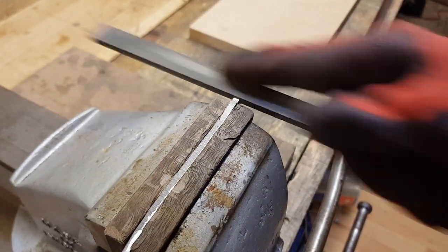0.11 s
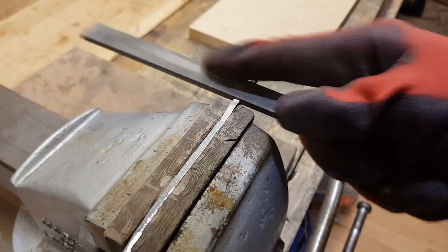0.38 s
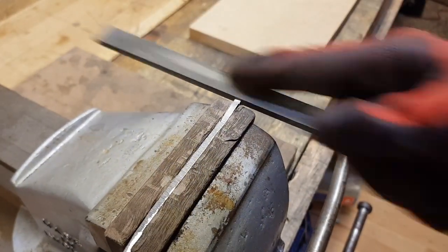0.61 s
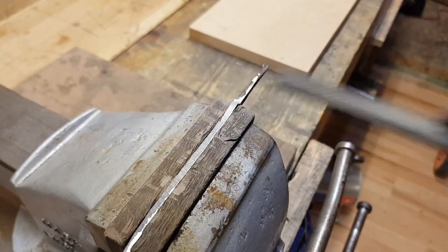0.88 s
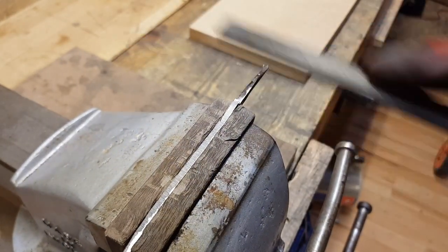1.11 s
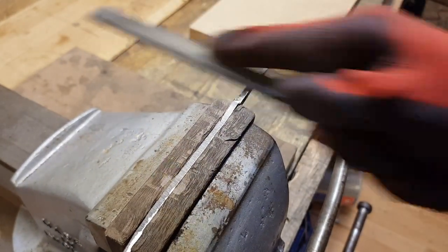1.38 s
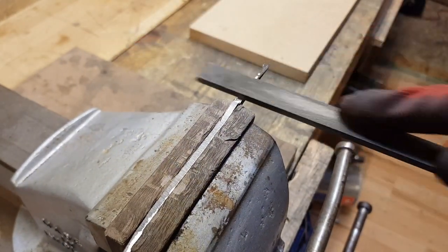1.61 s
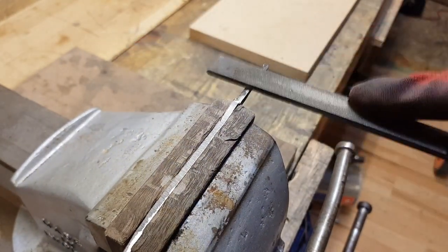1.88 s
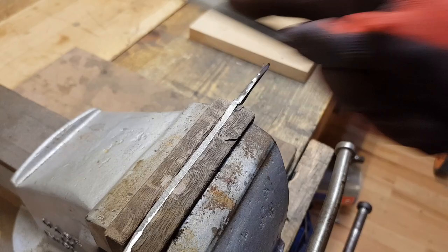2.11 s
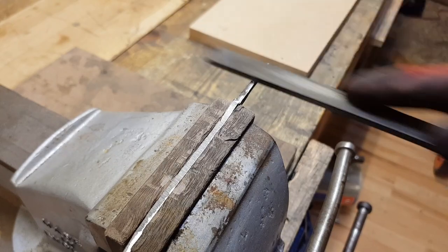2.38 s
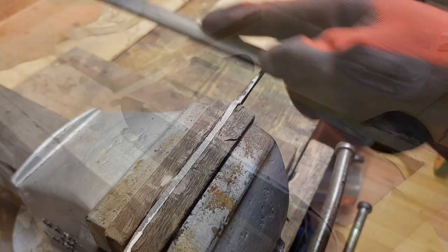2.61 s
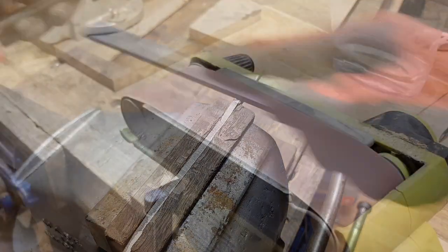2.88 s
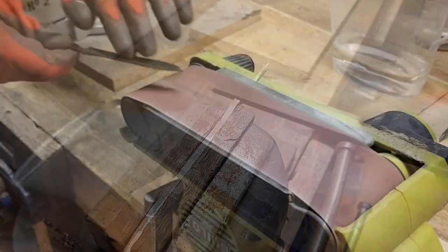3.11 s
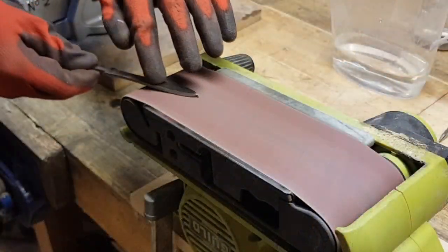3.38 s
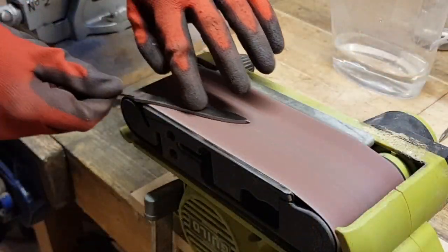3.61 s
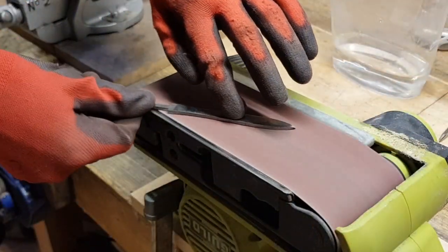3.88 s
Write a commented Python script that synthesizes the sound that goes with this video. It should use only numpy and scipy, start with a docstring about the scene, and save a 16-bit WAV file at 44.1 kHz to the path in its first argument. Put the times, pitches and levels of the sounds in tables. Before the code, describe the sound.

Metal filing in quick squeaky strokes, then slower pushes, before a belt sander runs up and whines

```python
"""A steel file works a thin blade clamped in a vice: quick back-and-forth strokes, then slower single pushes.
The rasp is made of dense uneven clicks that ring the steel; the blade chatters, squeaks and whistles in
short rough squeals, the file knocks the vice jaws, and filtered noise rumbles through the bench.
Then a belt sander fades in as it runs up to speed: tones tied to one speed whine over noise for air and grit.
Soft room tone lies beneath."""
import sys
import numpy as np
from scipy import signal
from scipy.fft import rfft, irfft
from scipy.io import wavfile
from scipy.ndimage import uniform_filter1d

SR = 44100
rng = np.random.default_rng(int(sys.argv[2]) if len(sys.argv) > 2 else 0)


def volts(x):
    """Linear amplitude factor 10**(x/20) for a level x in dB, scalar or array-like."""
    e = np.asarray(x, float) / 20
    return 10 ** e


def store_wav(level_fs):
    """Save 16-bit WAV to argv[1]."""
    pcm = np.round(np.clip(np.atleast_2d(level_fs), -1, 1) * 32767)
    wavfile.write(sys.argv[1], SR, pcm.T.astype(np.int16))


N = 176400
T = np.arange(N) / SR  # time in seconds
HZ = np.fft.rfftfreq(N, 1 / SR)  # frequency axis

# quick strokes that never leave the blade: (fastest moment t/s, rasp level/dB)
QUICK_STROKES = [(.022, -48), (0.06, -53.5), (0.097, -57), (0.134, -54), (0.167, -48), (0.199, -55),
                 (0.234, -52), (0.269, -55.5), (0.307, -50.5), (0.345, -55), (0.376, -51), (0.41, -50.5),
                 (0.447, -50), (0.513, -51.5), (0.549, -52), (.593, -51.5), (0.63, -53), (0.665, -52),
                 (.733, -45), (0.771, -52), (0.808, -51), (0.844, -53), (.892, -53.5), (0.927, -55.5)]
# single pushes: (touch t/s, hardest t/s, rasp level/dB, bench rumble level/dB)
SINGLE_PUSHES = [(1.022, 1.12, -58.5, -66.5), (1.214, 1.273, -61.5, -62.5), (1.339, 1.428, -58.5, -64.5),
                 (1.494, 1.578, -56, -62), (1.661, 1.745, -53.5, -59.5), (1.813, 1.884, -53.5, -58),
                 (1.956, 2.029, -52, -58), (2.109, 2.158, -52, -60.5), (2.231, 2.273, -51, -61.5),
                 (2.342, 2.381, -52, -61.5), (2.442, 2.476, -54.5, -65), (2.546, 2.576, -55, -66),
                 (2.64, 2.68, -57.5, -68)]
# colour of the quick strokes' rasp: (f/Hz, relative level per Hz/dB)
QUICK_COLOUR = [(600, -21.5), (1500, -17.5), (2700, -12.5), (4300, -6.5), (9000, -2.5), (16000, -2)]
# colour of the pushes' rasp: (f/Hz, relative level per Hz/dB)
PUSH_COLOUR = [(600, -36), (1500, -5.5), (2900, -5), (4300, -0.5), (9000, 1), (16000, 2.5)]
# colour of the bench rumble: (f/Hz, relative level per Hz/dB)
RUMBLE_COLOUR = [(110, -40), (200, 4.5), (265, -4.5), (320, 2.5), (450, -14.5), (650, -5), (1400, -18.5),
                 (2500, -47)]
# ringing of file and blade: (f/Hz, width/Hz, level against the grit/dB)
STEEL_RINGS = [(5170, 88, -19), (6460, 260, -15), (8330, 72, -8.5), (10290, 31, -9)]
# stick-slip chatter of the blade: (middle t/s, f/Hz, level/dB, octave level/dB)
BLADE_CHATTER = [(0.023, 4175, -54, -46), (0.104, 3700, -58.5, -54.5), (0.307, 4750, -51, -48.5),
                 (0.374, 4310, -51, -45.5), (0.669, 4450, -59, -58), (.732, 4180, -51, -39),
                 (0.811, 4030, -56, -47.5)]
# squeaks that glide with the speed of a push: (middle t/s, f/Hz, glide/Hz per s, level/dB)
BLADE_SQUEAKS = [(1.248, 4380, 7, -70), (1.42, 4180, -9000, -57.5), (1.576, 3794, -20000, -59.5),
                 (1.741, 3733, -20000, -52.5), (2.132, 4250, 6000, -60.5), (2.369, 4370, 15000, -66),
                 (2.669, 4180, 6000, -65.5)]
# high whistles of the blade tip: (middle t/s, f/Hz, level/dB)
TIP_WHISTLES = [(0.091, 14300, -32.5), (0.159, 14300, -38.5), (0.441, 14450, -38.5), (0.515, 14250, -35),
                (0.588, 13900, -38), (0.66, 14330, -42.5), (0.843, 14100, -47), (0.891, 14200, -44),
                (1.083, 14840, -45.5), (1.399, 15000, -47), (2.464, 13800, -38), (2.891, 14400, -47),
                (2.935, 14760, -43)]
# the file ticks on the blade: (t/s, relative strength/dB)
FILE_TICKS = [(1.051, -46.5), (1.6039, -50.5)]
# the file knocks the vice jaws: (t/s, relative strength/dB)
JAW_KNOCKS = [(0.219, -55), (0.406, -56.5), (0.474, -58), (0.5, -56), (0.648, -54.5)]
# sander running up: (t/s, belt-tooth rate f/Hz, tooth whine level/dB, overall level/dB)
SANDER_RUN = [(2.718, 1001, -64.5, -56), (2.74, 1281, -58, -57), (2.77, 1471, -57.5, -52),
              (2.815, 1633, -60, -55), (2.832, 1669, -78, -55.5), (2.85, 1712, -60.5, -51),
              (2.93, 1799, -55.5, -50), (3.05, 1839, -49, -48.5), (3.199, 1857, -48, -46),
              (3.42, 1858, -47, -45), (3.749, 1816, -48, -47.5), (4, 1789, -50, -46.5)]
# side tones of belt teeth, armature and pulley: (multiple of its rate,
# level against the overall level at top speed/dB)
BELT_TOOTH_TONES = [(2, -13), (3, -20)]
ARMATURE_TONES = [(1, -13.5), (3, -16), (8, -18), (12, -13), (13, -15.5)]
PULLEY_TONES = [(2, -30), (3, -29.5), (5, -27.5), (7, -19.5), (8, -22.5)]
# colour of the sander's air and grit: (f/Hz, relative level per Hz/dB)
RUSH_COLOUR = [(60, -31), (732, -14.5), (1040, -11), (1820, -7.5), (1950, -3.5), (16000, -7)]
# colour of the room tone: (f/Hz, relative level per Hz/dB)
ROOM_COLOUR = [(100, -10), (300, 2), (900, -12.5), (3000, -26.5), (9000, -29.5)]
# stereo balance of file and sander: (f/Hz, left minus right level/dB)
FILE_BALANCE = [(60, -8), (240, -26), (950, -12.5), (3770, 10), (15000, 14)]
SANDER_BALANCE = [(500, 0.93), (3800, 5.4), (15000, 16)]
# how alike left and right are for file and sander: (f/Hz, likeness, 1 = same)
FILE_LIKENESS = [(300, 0.95), (1900, 0.78), (4000, 0)]
SANDER_LIKENESS = [(1900, 1), (7500, 0.035)]


def evened(x):
    """Scales to a standard deviation of 1."""
    return x / np.std(x)


def read(points):
    """Spreads a table over the frequency axis, in straight lines over log frequency."""
    f, value = np.transpose(points)
    return np.interp(np.log(HZ + 1), np.log(f + 1), value)


def coloured(x, points):
    """Filters by a spectrum table in a way that keeps the power of white noise."""
    gain = volts(read(points))
    return irfft(rfft(x) * gain, N) / np.sqrt(np.mean(gain * gain))


def resonate(x, hz, width):
    """A fixed or moving resonance of gain 1: shift its pitch to zero, smooth, shift back."""
    turn = np.exp(2j * np.pi * np.cumsum(hz * np.ones(len(x))) / SR)
    r = np.exp(-np.pi * abs(width) / SR)
    return 2 * (turn * signal.lfilter([1 - r], [1, -r], x / turn)).real


def ring(x, hz, width):
    """A resonance raised to make up for the power that its narrow band loses."""
    return resonate(x, hz, width) * np.sqrt(SR / 2 / np.pi / width)


def drift(size, length=N):
    """Slow chance wandering of spread 1: noise smoothed twice over size samples."""
    noise = rng.standard_normal(length)
    return evened(uniform_filter1d(uniform_filter1d(noise, size), size))


def ports(x, balance, likeness, scatter_s):
    """Two microphone ports: a balance by frequency, and a scattered copy where they hear unlike paths."""
    lag_s = 5e-5
    same = np.clip(read(likeness), -.95, .95)
    lean = volts(read(balance) / 2)
    echo = rng.standard_normal(N) * np.exp(-T / scatter_s)
    scatter = rfft(echo) / np.linalg.norm(echo)
    z = rfft(x) * 2 / np.sqrt(lean * lean + 1 / lean / lean + 2 * same)
    mixed = same + np.sqrt(1 - same * same) * scatter
    late = np.exp(-2j * np.pi * HZ * lag_s)
    return irfft([z * lean, z / lean * mixed * late], N)


def room_tone():
    """Steady coloured noise, the quiet of the room."""
    return volts(-79.5) * coloured(rng.standard_normal(N), ROOM_COLOUR)


def sander():
    """Belt teeth, armature and pulley sing on one speed over the rush of air and grit."""
    armature_ratio, pulley_ratio = .4784, .08944  # rates against the belt-tooth rate
    howl_s, howl_length_s, howl_db, howl_ratio = 2.752, .04, -57, 2.87
    s, hz, whine_db, all_db = np.transpose(SANDER_RUN)
    fade_db = -900 * np.maximum(s[0] - T, 0)  # steep fade-in
    hz = uniform_filter1d(np.interp(T, s, hz), size=500) * (1 + 0.00071 * drift(size=800))
    turns = 2 * np.pi * np.cumsum(hz) / SR
    whine = volts(np.interp(T, s, whine_db) + fade_db)
    overall = volts(np.interp(T, s, all_db) + fade_db)
    out = whine * np.sqrt(2) * np.sin(turns) * volts(0.24 * drift(size=300))

    settled = (hz / hz.max()) ** 4  # the side tones come up steeply with speed
    parts = [(1, BELT_TOOTH_TONES), (armature_ratio, ARMATURE_TONES), (pulley_ratio, PULLEY_TONES)]
    for ratio, tones in parts:
        for k, db in tones:
            level = overall * settled * volts(db + 2.0 * drift(size=1500))
            out += level * np.sqrt(2) * np.sin(round(k) * ratio * turns)

    # a howl while the motor catches
    howl = volts(howl_db - 20 * ((T - howl_s) / howl_length_s) ** 2)
    out += howl * np.sin(howl_ratio * turns)

    # the rush pulses slightly with the pulley
    pulse = 1 + 0.028 * np.cos(pulley_ratio * turns)
    air = rng.standard_normal(N) * pulse * volts(1.0 * drift(size=60))
    return out + overall * coloured(air, RUSH_COLOUR)


def knocks():
    """Dull blows on the vice jaws: low sines that die away in a cycle or two."""
    knock_hz, decay_s = 650, 0.002
    out = np.zeros(N)
    for s, db in JAW_KNOCKS:
        t = np.maximum(T - s, 0)
        out += 2 * volts(db) * np.exp(-t / decay_s) * np.sin(2 * np.pi * knock_hz * t)
    return out


def add_squeal(out, s, length, hz, glide, wander, width, levels, linger=1):
    """Adds one rough, wavering squeal with its overtones, in a bell-shaped swell."""
    skirt_db = -11.5  # wide noise around each tone
    t = np.arange(max(-2 * length, -s), 3 * length, 1 / SR)
    f = hz * (1 + wander * drift(size=200, length=len(t))) + glide * t
    noises = rng.standard_normal((2, len(t)))
    # linger slows the dying away
    swell = volts(-6 * (2 * t / length) ** 2 / (1 + linger * np.maximum(t / length, 0)))
    start = round((s + t[0]) * SR)
    for k, db in enumerate(levels, 1):
        core, skirt = (evened(resonate(resonate(noise, k * f, k * w), k * f, k * w))
                       for noise, w in zip(noises, (width, 5 * width)))
        pure = np.cos(2 * np.pi * k * np.cumsum(f) / SR) / k / k / 2
        tone = pure + core + volts(skirt_db) * skirt
        out[start:][:len(t)] += volts(db) * swell * tone


def squeals():
    """Stick-slip chatter and gliding squeaks of the blade, and whistles of its tip."""
    chatter_s, chatter_wander, chatter_width_hz = .015, .02, 220
    squeak_s, squeak_width_hz = .024, 140
    whistle_s, whistle_wander, whistle_width_hz = 0.0096, 0.0116, 510
    third_db = -9  # third tone of a chatter against its octave
    sag = 1.426  # squeals droop as the stroke slows, in units of their wander
    out = np.zeros(N)
    for s, hz, db, octave_db in BLADE_CHATTER:
        droop = -sag * chatter_wander * hz / chatter_s
        levels = [db, octave_db, octave_db + third_db]
        add_squeal(out, s, chatter_s, hz, droop, chatter_wander, chatter_width_hz, levels)
    for s, hz, glide, db in BLADE_SQUEAKS:
        levels = [db, db + third_db / 2]
        add_squeal(out, s, squeak_s, hz, glide, chatter_wander / 2, squeak_width_hz, levels, linger=0)
    for s, hz, db in TIP_WHISTLES:
        droop = -sag * whistle_wander * hz / whistle_s
        add_squeal(out, s, whistle_s, hz, droop, whistle_wander, whistle_width_hz, [db])
    return out


def pressure():
    """Rasp, vice and rumble envelopes: quick strokes are bells over a resting scrape, pushes swell and lift off."""
    quick_half_s, quick_dip_db, quick_rest_db, quick_end_s = .019, -12, -60, 0.931
    rise_db_per_s, fall_db, fall_s, touch_s = 232, -21, 0.023, 0.0011
    tail_db, tail_s = -6, 0.0067  # the workshop rings on briefly
    vice_share, rumble_share, smear_s = 0.18, .7, .012

    sliding = np.exp(-np.maximum(T - quick_end_s, 0) / touch_s)
    quick = volts(quick_rest_db) * sliding
    rumble = volts(-72.5 + 3.4 * drift(size=1500)) * sliding
    for top, db in QUICK_STROKES:
        bell_db = quick_dip_db * abs((T - top) / quick_half_s) ** 3
        quick = np.maximum(quick, volts(db + bell_db))
    rumble = rumble * (quick / quick.mean()) ** 0.43  # each catch of the teeth knocks the bench

    rasp, vice = 0, 0
    for touch, top, rasp_db, rumble_db in SINGLE_PUSHES:
        after = np.maximum(T - top, 0)
        db = -rise_db_per_s * np.clip(top - T, 0, top - touch) + fall_db * (after / fall_s) ** 2.4
        # the vice rings from the first touch, hardly more under pressure
        vice = vice + volts(rasp_db + np.where(T < top, vice_share, 1) * db) * (T > touch)
        tail = volts(tail_db) * np.exp(-abs(T - top) / tail_s) * (T > top)
        shape = (volts(db) + tail) * np.exp(-np.maximum(touch - T, 0) / touch_s)
        rasp = rasp + shape * volts(rasp_db)
        rumble = rumble + shape ** rumble_share * volts(rumble_db)
    return quick, rasp, vice, uniform_filter1d(rumble, round(smear_s * SR) + 1)


def filing():
    """Teeth tear out grit: dense uneven clicks ring the steel, and a rumble runs through vice and bench."""
    grit_per_s, grit_spread_db = 16000, 2.5
    vice_hz, vice_width_hz, vice_db = 1560, 160, -11
    chirp_hz, chirp_swing, chirp_width_hz, chirp_db = 4524, 0.066, 590, -12.5
    quick, rasp, vice, rumble = pressure()

    size = volts(grit_spread_db * np.minimum(rng.exponential(1, N), 3)) * rng.standard_normal(N)
    clicks = size * (rng.random(N) < grit_per_s / SR)
    grit = evened(clicks) * volts(2.43 * drift(size=150))
    ticks = sum(volts(db) * (T > s) * np.exp(-abs(T - s) / 0.0029) for s, db in FILE_TICKS)
    drive = grit * (rasp + ticks / 2)

    struck = drive + 0.48 * grit * quick
    rung = sum(volts(db) * ring(struck, hz, width) for hz, width, db in STEEL_RINGS)

    # the blade's ring wanders
    spot_hz = chirp_hz * (1 + chirp_swing * drift(size=900))
    chirps = grit * volts(3.6 * drift(size=400))
    for _ in range(2):
        chirps = resonate(chirps, spot_hz, chirp_width_hz)
    rung += volts(chirp_db) * evened(chirps) * (quick + rasp / 2)

    wavering = vice + 0.35 * quick * volts(5.5 * drift(size=1200))
    rung += volts(vice_db) * ring(grit * wavering, vice_hz, vice_width_hz)

    rasping = coloured(grit * quick, QUICK_COLOUR) + coloured(drive, PUSH_COLOUR)
    return rasping + rung + rumble * coloured(rng.standard_normal(N), RUMBLE_COLOUR)


def scene():
    """Room tone, sander, knocks and file together in stereo."""
    # the scattering wraps around in time, so the start is kept free of the sander
    sanding = ports(sander(), SANDER_BALANCE, SANDER_LIKENESS, scatter_s=.06) * (T > 2)
    bench = filing() + squeals() + room_tone()
    return ports(bench, FILE_BALANCE, FILE_LIKENESS, scatter_s=.011) + knocks() + sanding


def low_pass(x):
    """Removes everything above the highest recorded frequency."""
    return signal.sosfilt(signal.butter(12, 16340, fs=SR, output="sos"), x)


def record(dry):
    """The microphone's bass cut around 60 Hz and its band limit at 16250 Hz."""
    bass_cut = 1 / (1 + (60 / (HZ + 1)) ** 2)
    mix = irfft(rfft(dry) * (HZ < 16250) * bass_cut, N)
    return low_pass(mix)


dry = scene()
out = record(dry)
store_wav(out)
```